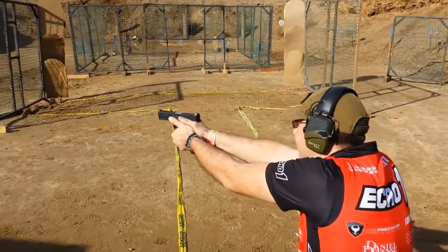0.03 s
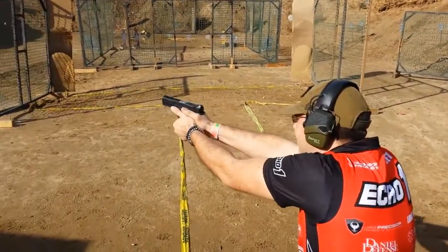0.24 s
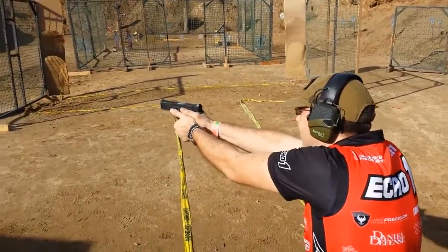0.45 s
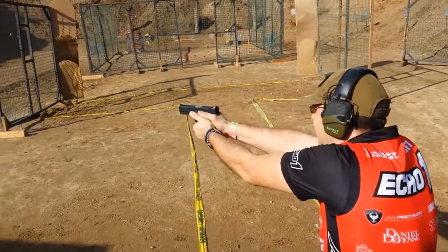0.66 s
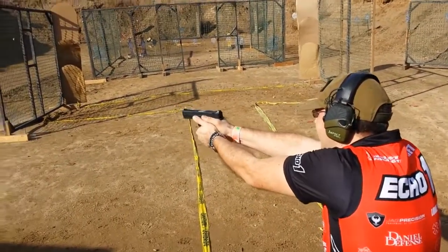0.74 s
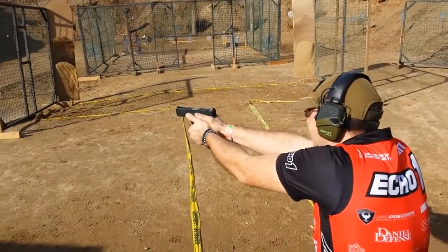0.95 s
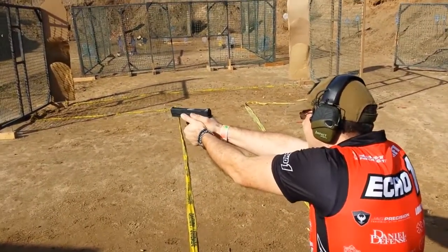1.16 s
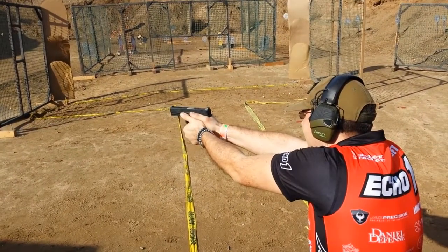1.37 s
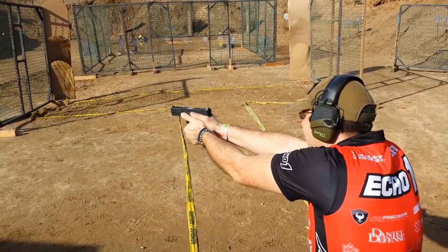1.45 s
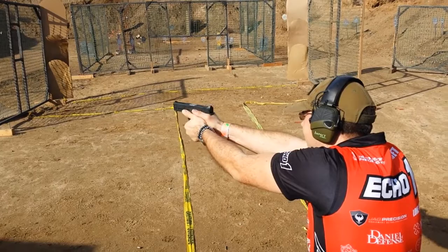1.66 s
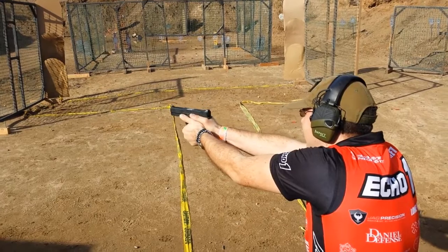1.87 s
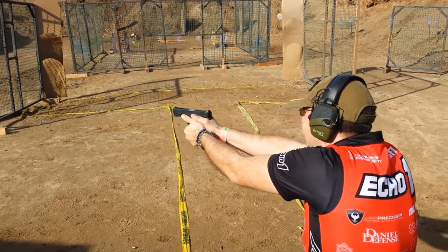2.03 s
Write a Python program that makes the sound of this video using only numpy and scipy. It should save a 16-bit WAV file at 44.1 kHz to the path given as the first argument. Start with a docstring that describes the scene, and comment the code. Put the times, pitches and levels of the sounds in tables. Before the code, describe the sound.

Pistol shots at an outdoor range, close to the microphone. Small ticks at 0.1 s precede a sharp, overloaded blast at 0.23 s, with bank echoes and a bright steel ring from 0.29 s, damped around 0.5 s. A duller farther shot thuds at 0.56 s and rolls off into low rumble, ducked hiss and faint ticks. A second blast at 1.62 s brings echoes, high plate ringing at 1.7 s, a lower clang at 1.8 s and bright case ticks.

```python
"""Two pistol shots close to the microphone, at an outdoor range with earth banks: each blast is a burst of
treble hiss, reflections and a low push, which the banks throw back as sagging slaps and a rolling tail.
Steel plates ring in beating modes when hit, and a farther shot thuds in between with a dull tail.
Brass cases and grit tick on the ground as short bursts of noise. Behind lie a rumble, a hum and open-air
hiss; the gain control ducks the hiss, and the blasts overload the input."""
import sys
import numpy as np
from scipy import signal
from scipy.fft import rfft, irfft
from scipy.io import wavfile
from scipy.ndimage import uniform_filter1d

SR = 44100
rng = np.random.default_rng(int(sys.argv[2]) if len(sys.argv) > 2 else 0)


def dump(signal):
    """Clip the signal to [-1, 1] and save it as 16-bit WAV at the path in sys.argv[1]."""
    limited = np.clip(np.atleast_2d(signal).T, -1, 1)
    pcm = np.round(limited * 32767).astype(np.int16)
    wavfile.write(sys.argv[1], SR, pcm)


def elevation(decibels):
    """Turn decibel levels (scalar or array-like) into linear amplitude ratios."""
    levels = np.asarray(decibels, float)
    return 10 ** (levels / 20)


N = 92610  # samples

# colour of the blast's treble hiss, near or far: (frequency [Hz], relative density [dB per Hz])
TREBLE_COLOUR = [(710, -35.5), (1200, -2.5), (1560, -3), (2740, -6.5), (2990, -7), (3980, -3.5),
                 (5520, -2.5), (10700, -8), (11900, -14.5), (15500, -50.5), (22000, -120)]
# colour of the rolling bass, near or far: (frequency [Hz], relative density [dB per Hz])
BASS_COLOUR = [(20, -29.5), (60, -6), (130, -2.5), (270, 3.5), (400, 1), (600, -43.5)]
FACETS_PER_S = 900  # mean number of small reflections per second


def read(points, hz):
    """Reads a table on a log-frequency axis."""
    f, value = np.transpose(points)
    return np.interp(np.log(hz + 1), np.log(f + 1), value)


def evened(x):
    """Scales to rms 1."""
    return x / np.sqrt(np.mean(x ** 2) + 1e-20)


def add(mix, s, sound):
    """Mixes a sound in at time s [s], cut off at the end of the mix."""
    part = mix[..., int(round(s * SR)):][..., :sound.shape[-1]]
    part += sound[..., :part.shape[-1]]


def pair(a, b, colour):
    """Colours two unrelated signals into a left and right pair of partial likeness, rms 1."""
    # stereo likeness: (frequency [Hz], left-right correlation [0-1])
    likeness = [(60, .85), (140, 0.32), (350, 1), (830, .85), (1500, .5), (2800, .7), (5500, .55),
                (11400, .6)]
    # stereo balance: (frequency [Hz], left minus right [dB])
    balance = [(60, 0.5), (170, 0.0), (490, 0.5), (1400, 0.5), (4010, 1), (11400, -3)]
    hz = np.fft.rfftfreq(N, 1 / SR)
    same = np.clip(read(likeness, hz), 0, 1)
    lean = elevation(read(balance, hz) / 2)
    gain = elevation(read(colour, hz))
    middle = rfft(a) * gain
    side = rfft(b) * gain * np.sqrt((1 - same) / (1 + same))
    return evened(irfft(np.array([(middle + side) * lean, (middle - side) / lean]), N))


def hiss(colour):
    """Smooth coloured noise."""
    return pair(*rng.standard_normal((2, N)), colour)


def background():
    """A low rumble of the open range, as coloured noise, with a wavering hum, as a narrow band of noise."""
    # colour of the rumble: (frequency [Hz], relative density [dB per Hz])
    rumble_colour = [(20, -39), (45, -15.5), (70, -1), (130, -6.5), (300, -7.5), (700, -16), (1200, -28.5),
                     (2700, -35.5), (11500, -45.5), (12500, -69.5)]
    # course of the rumble: (time [s], level [dB])
    rumble_level = [(0, -56), (1.0, -57), (1.25, -62), (1.4, -59.5), (1.55, -50), (1.595, -52.5),
                    (1.615, -63), (2.1, -57.5)]
    hum_hz, hum_db, hum_width_hz = 73, -60.5, 8
    t, f = np.arange(N) / SR, np.fft.rfftfreq(N, 1 / SR)
    hum_band = np.exp(-((f - hum_hz) / hum_width_hz) ** 2)
    hum = evened(irfft(rfft(rng.standard_normal(N)) * hum_band, N))
    rumble = elevation(np.interp(t, *np.transpose(rumble_level))) * hiss(rumble_colour)
    return rumble + elevation(hum_db) * hum


def open_air_hiss(dry):
    """Open-air noise, ducked by a gain control that drops ahead of loud sound and recovers slowly."""
    # colour of the open air: (frequency [Hz], relative density [dB per Hz])
    air_colour = [(15, -40.5), (25, -9), (103, 1.5), (313, 0), (793, -13.5), (1630, -15), (4350, -22.5),
                  (5490, -19), (7680, -25.5), (11900, -28.5), (15500, -62), (22000, -120)]
    air_db = -37  # undisturbed level
    knee_db, duck = -29.5, 0.84  # ducking starts here; dB of ducking per dB above it
    recover_db_per_s, ahead_s = 2, .03
    t = np.arange(N) / SR
    power_db = 10 * np.log10(abs(uniform_filter1d((dry ** 2).mean(0), 400)) + 1e-12)
    recovery = recover_db_per_s * t
    held_db = np.maximum.accumulate(power_db + recovery) - recovery
    over_db = np.maximum(held_db - knee_db, 0)
    ahead = int(ahead_s * SR)
    # the mean is taken over what follows, so the ducking leads the blast
    over_db = uniform_filter1d(over_db, ahead, origin=-(ahead // 2), mode="nearest")
    return elevation(air_db - duck * over_db) * hiss(air_colour)


def ticks():
    """Brass cases and grit: short bright bursts of noise around a pitch, each dying exponentially."""
    # ticks on the ground: (time [s], nominal peak level [dB], pitch [Hz], time to fall 20 dB [s])
    tick_table = [(.085, -18, 5630, 0.0072), (.089, -22.5, 8500, 0.0105), (0.095, -25.5, 6000, 0.057),
                  (.131, -27, 6500, 0.037), (0.666, -39, 5400, 0.018), (0.943, -54, 4630, 0.16),
                  (1.075, -47.5, 11460, .008), (1.166, -50, 8620, 0.0041), (1.288, -43, 1700, 0.0081),
                  (1.297, -56.5, 4045, 0.043), (1.407, -62.5, 7000, .06), (1.421, -51, 6500, 0.0108),
                  (1.476, -41.5, 6500, 0.0048), (1.53, -47, 6000, 0.0064), (1.587, -52, 5000, 0.0057),
                  (1.796, -15, 5640, .006), (1.909, -20, 6500, 0.0056), (1.974, -40.5, 4500, 0.012)]
    width = 0.64  # of the band, in natural log of frequency
    top_hz, rise_s = 10700, .0006  # roll-off, onset
    t, out = np.arange(4096) / SR, np.zeros((2, N))
    f = np.fft.rfftfreq(4096, 1 / SR)
    for s, db, hz, length in tick_table:
        a, b = rng.standard_normal((2, 4096))
        band = np.exp(-(np.log(f / hz + 1e-9) / width) ** 2 - (f / top_hz) ** 12)
        burst = evened(irfft(rfft([a + .5 * b, a - .5 * b]) * band))
        # the rms starts 5 dB under the nominal peak
        add(out, s, burst * np.minimum(t / rise_s, 1) * elevation(db - 5 - 20 * t / length))
    return out


def facets():
    """Sparse small reflections of slightly uneven size, the grain of the middle band."""
    # colour of the middle band: (frequency [Hz], relative density [dB per Hz])
    middle_colour = [(250, -41), (400, -4), (700, 3), (1000, -2.5), (1500, -19), (2500, -38.5)]
    spread_db = -0.5
    size = elevation(spread_db * np.minimum(rng.exponential(1, (2, N)), 4))
    size = size * rng.choice([-1., 1.], (2, N))
    present = rng.random((2, N)) < FACETS_PER_S / SR
    return pair(*(size * present), middle_colour)


def dulled(x):
    """Patchy hiss whose highest treble dies sooner, lost in the air the longer it has travelled."""
    tilt_db_per_s = 16  # loss per octave above 2 kHz; a gain below it, down to 500 Hz
    absorb_db_per_s = 54.5  # loss at 13 kHz, growing with the cube of frequency
    patchy_db = 3  # unevenness of the hiss, rms
    hz, t, z = signal.stft(x, SR, nperseg=256)
    patches = uniform_filter1d(rng.standard_normal(z.shape[1:]), size=3, axis=0)
    patches = evened(uniform_filter1d(patches, size=5, axis=1))
    loss = tilt_db_per_s * np.log2(np.maximum(hz, 500) / 2000)
    loss = loss + absorb_db_per_s * (hz / 13000.0) ** 3
    travelled_db = loss[:, None] * np.minimum(t, .8)
    return signal.istft(z * elevation(patchy_db * patches - travelled_db), SR, nperseg=256)[1][:, :N]


def slap(db, hz, thud_db, crack_db, thud_hz):
    """A few cycles that sag in pitch, a scatter of smaller ones behind, a low thud and a short crack."""
    t60_s, rise_s = 0.021, .0015
    after_db, after_t60_s = -9, .12  # the scatter behind, before its fade-in
    t = np.arange(5000) / SR
    shape = (1 - np.exp(-t / rise_s)) * elevation(-60 * t / t60_s)
    shape = shape / shape.max()
    body = np.sin(2 * np.pi * hz * (t - 8. * t ** 2)) * shape
    # the scatter: small copies of the body at random moments
    a, b = rng.standard_normal((2, len(t))) * (rng.random(len(t)) < FACETS_PER_S / SR)
    after = evened(signal.fftconvolve([a + .4 * b, a - .4 * b], [body[:200]])[:, :len(t)])
    after = after * np.minimum(t / 0.005, 1) * elevation(after_db - 60 * t / after_t60_s)
    thud = np.sin(2 * np.pi * thud_hz * t) * np.minimum(t / .006, 1) * elevation(thud_db - 60 * t / 0.18)
    noise = signal.lfilter(*signal.butter(2, 5000, fs=SR), rng.standard_normal((2, len(t))))
    crack = elevation(crack_db) * noise * shape
    return elevation(db) * (body + after + crack + thud)


def shots():
    """Both blasts meet the same banks, so middle, bass and slaps repeat; the treble hiss is new each time."""
    # near shots: (time [s], level [dB], treble [dB re shot], low push [dB re shot])
    shot_table = [(0.2338, -1.5, 3.5, -17), (1.617, -2.5, 4, -26.5)]
    # what the range returns: (time after the shot [s], treble [dB], middle [dB], bass [dB])
    return_table = [(0, -22, -29.5, -29), (.001, -9.5, -12.5, -27), (.004, -3, -14, -15.5),
                    (.012, -10, -5.5, -14.5), (.05, -8, -10, -17), (.1, -17, -15, -27.5),
                    (.108, -19.5, -21.5, -25.5), (.16, -25.5, -22.5, -31.5), (.178, -24, -26.5, -30.5),
                    (.19, -21.5, -20.5, -22), (.23, -33, -29.5, -35), (.25, -34, -35.5, -34),
                    (.3, -39, -33.5, -40.5), (.32, -41.5, -28, -39.5), (.4, -47, -46, -53),
                    (.48, -44.5, -47.5, -48.5), (.7, -60.5, -59, -75), (1.0, -76, -67.5, -70.5),
                    (1.4, -100, -101, -84.5)]
    # single slaps off banks and barriers: (time after the shot [s], level [dB re shot], pitch [Hz])
    slap_table = [(.010, -7, 814), (.033, -11.5, 650), (.096, -9.5, 750), (.138, -21, 795),
                  (.1785, -2, 800), (.185, -12.5, 600), (.198, -14, 700), (.258, -20.5, 734),
                  (.269, -23, 750), (.281, -24.5, 750), (.309, -28, 730), (.357, -18.5, 770),
                  (.448, -32.5, 740)]
    crack_db, thud_db, thud_hz = -21.5, -15, 142  # dB relative to each slap
    push_hz, push_t60_s = 36, .15
    t, rows = np.arange(N) / SR, np.transpose(return_table)
    treble, middle, bass = (elevation(np.interp(t, rows[0], db)) for db in rows[1:])
    low = facets() * middle + hiss(BASS_COLOUR) * bass
    for delay, db, hz in slap_table:
        add(low, delay, slap(db, hz, thud_db, crack_db, thud_hz))
    out = np.zeros((2, N))
    for s, db, treble_db, push_db in shot_table:
        push = np.sin(2 * np.pi * push_hz * t) * elevation(push_db - 60 * t / push_t60_s)
        high = elevation(treble_db) * dulled(hiss(TREBLE_COLOUR)) * treble
        add(out, s, elevation(db) * (low + push + high))
    return out


def plates():
    """Each struck steel plate rings in decaying modes that beat, until it tips onto its stop and is damped."""
    # plates: (time struck [s], left minus right [dB], time until it tips onto its stop [s], modes), each mode
    # (frequency [Hz], level before beating [dB], t60 [s], beat [Hz], a dip after the hit [s], depth [0-1])
    plate_table = [(.29, 0, .205, [(2398, -12, 2.0, 7, .07, .2), (6198, -19, 1.1, 13, .075, .5),
                   (6534, -30, .6, 5, .1, .5), (5197, -33, .5, 4, .15, .5)]),
                   (1.70, 0, .3, [(8032, -15, .36, 10, .095, .7), (7963, -27, .4, 5, .12, .5),
                   (5692, -25, .6, 9, .07, .6)]), (1.808, 2, .5, [(1664, -16, .6, 10.6, .105, .93),
                   (1664, -12, .14, 0, 0, 0), (2360, -36, 1.0, 7.5, .075, .85)])]
    rise_s = .006
    stop_db, stop_s, stop_db_per_s = -14.5, 0.032, -58  # quick loss, its time, steady loss as well
    t, out = np.arange(SR) / SR, np.zeros((2, N))
    for s, pan_db, stop, modes in plate_table:
        ring = np.zeros(len(t))
        for hz, db, t60, beat, dip, depth in modes:
            swing = np.clip(depth, 0, 1) * np.exp(2j * np.pi * beat * (t - dip))
            beating = abs(1 - swing) / 2
            ring += elevation(db - 60 * t / t60) * np.sin(2 * np.pi * hz * t) * beating
        quick_db = stop_db * np.clip((t - stop) / stop_s, 0, 1)
        ring = ring * elevation(quick_db + stop_db_per_s * np.maximum(t - stop, 0))
        sides = elevation(np.array([[pan_db / 2], [-pan_db / 2]]))
        add(out, s, ring * np.minimum(t / rise_s, 1) * sides)
    return out


def far_shot():
    """Dull slaps and a soft tail from a shot farther off; the tail has lost its top."""
    # the farther shot and its slaps: (time [s], level [dB], pitch [Hz], thud [dB re slap], crack [dB re slap])
    far_table = [(.558, -11.5, 428, -7, -26.5), (.564, -20.5, 550, -2, -25.5), (.727, -25.5, 870, -18, -26),
                 (.745, -20, 830, -12.5, -14), (.752, -23.5, 603, -16.5, -14),
                 (0.758, -24.5, 324.6, -12, -31), (.872, -35.5, 430, -16, -30),
                 (0.956, -44.5, 830, -20.5, -13), (1.05, -44, 830, -10, -10)]
    # start of the tail: treble, middle, bass (level [dB])
    tail_db = (-39, -33.5, -37.5)
    # decay of the tail: treble, middle, bass (t60 [s])
    tail_t60_s = (0.9, .9, 0.64)
    top_hz, thud_hz = 7000, 99
    t = np.arange(N) / SR
    out = np.zeros((2, N))
    treble = signal.lfilter(*signal.butter(2, top_hz, fs=SR), dulled(hiss(TREBLE_COLOUR)))
    layers = treble, facets(), hiss(BASS_COLOUR)
    for layer, db, t60 in zip(layers, tail_db, tail_t60_s):
        add(out, far_table[0][0], layer * np.minimum(t / 0.0013, 1) * elevation(db - 60 * t / t60))
    for s, *row in far_table:
        add(out, s, slap(*row, thud_hz))
    return out


def scene():
    """Blasts, slaps, plates and ticks over the background."""
    return background() + ticks() + shots() + plates() + far_shot()


def roll_off(x):
    """The treble ends steeply here."""
    return signal.sosfilt(signal.butter(12, 12050, fs=SR, output="sos"), x)


def record(dry):
    """Adds the ducked open-air hiss, then input overload, band limit, clipping and a short final fade."""
    overload, edge_hz, fade_s = 1.15, 12050, 0.014  # ceiling, top of the band, slope of the fade
    t = np.arange(N) / SR
    x = dry + open_air_hiss(dry)
    x = overload * np.tanh(x / overload)
    lowpass = signal.firwin(255, edge_hz, window=("kaiser", 7), fs=SR)
    x = signal.oaconvolve(x, lowpass[None], "same")
    fade = np.minimum((t[-1] - t) / fade_s + .2, 1)  # ends at a fifth
    mix = np.clip(x, -1, 1) * fade
    return roll_off(mix)


dry = scene()
out = record(dry)
dump(out)
```